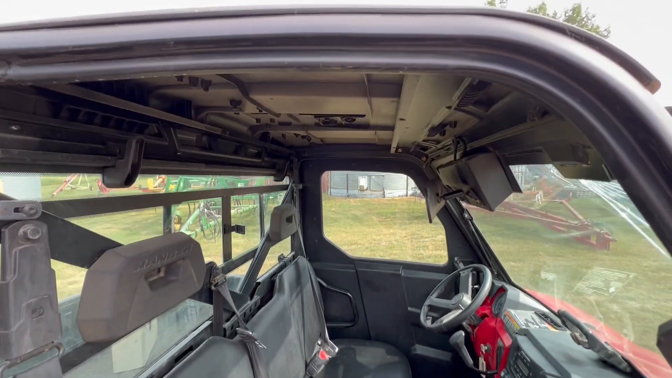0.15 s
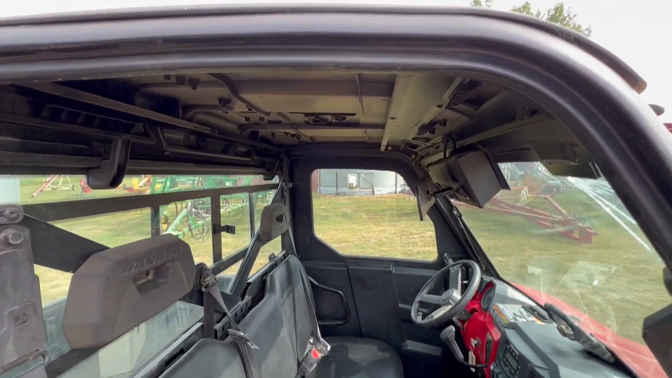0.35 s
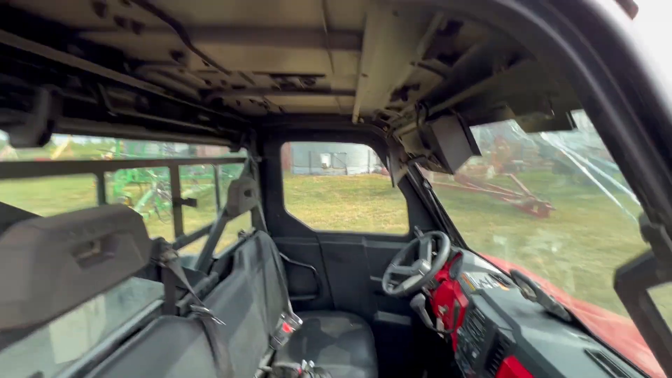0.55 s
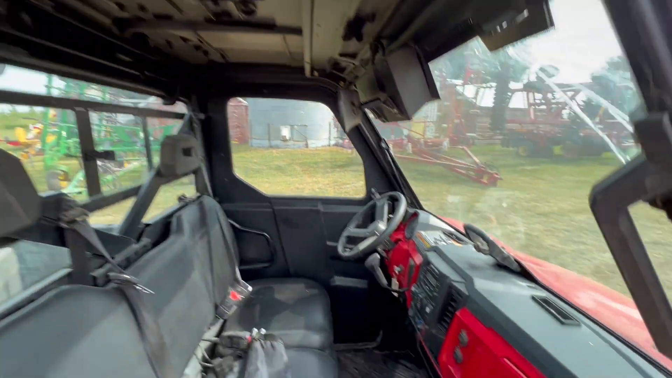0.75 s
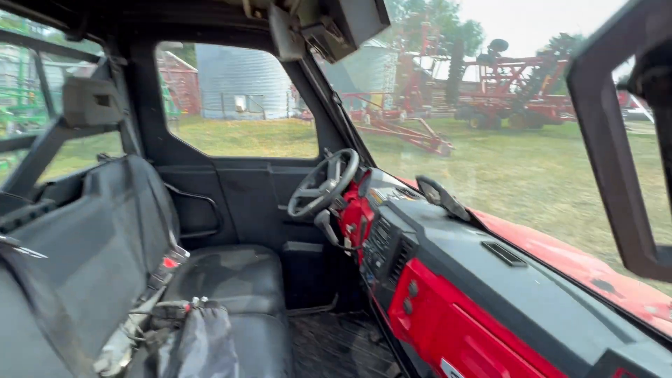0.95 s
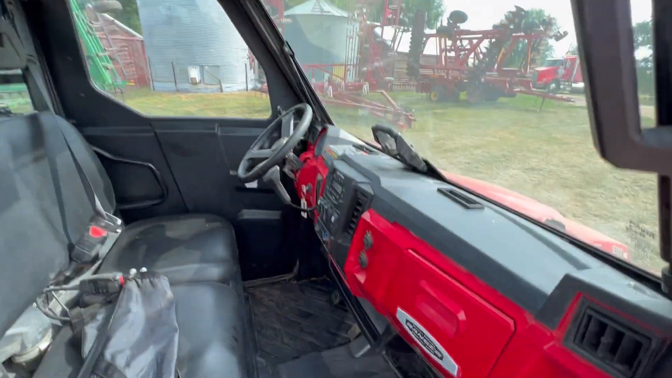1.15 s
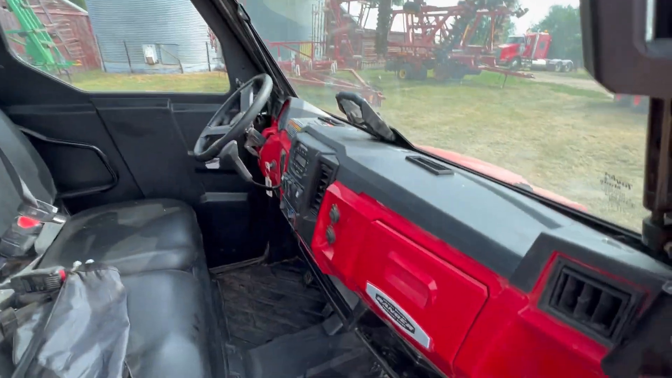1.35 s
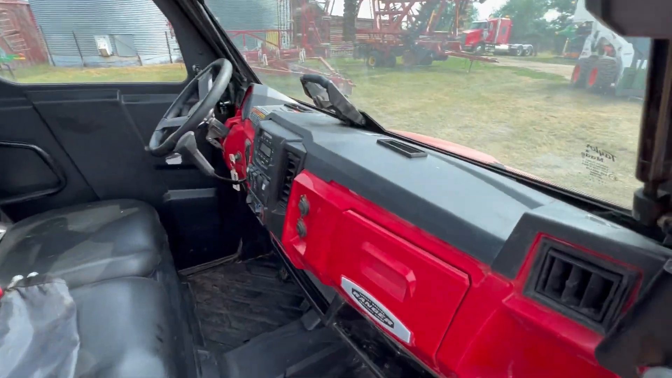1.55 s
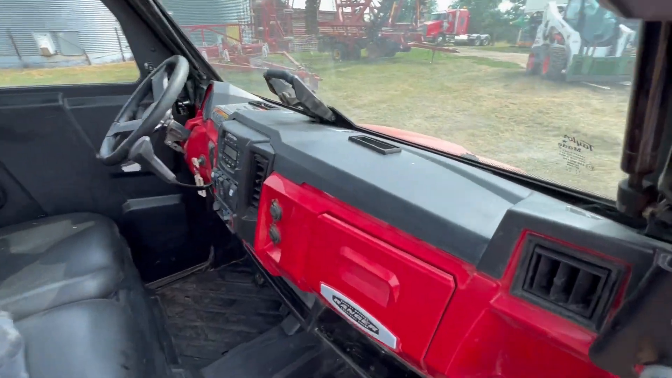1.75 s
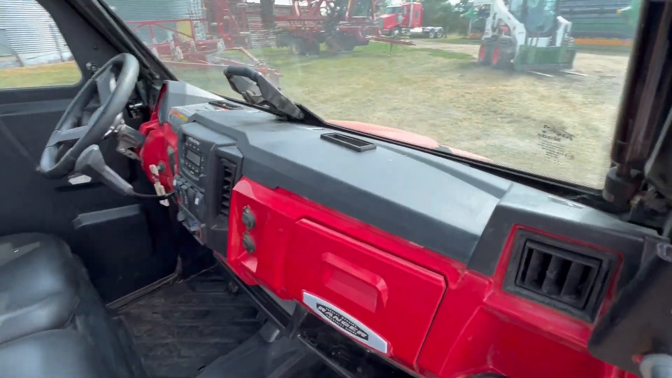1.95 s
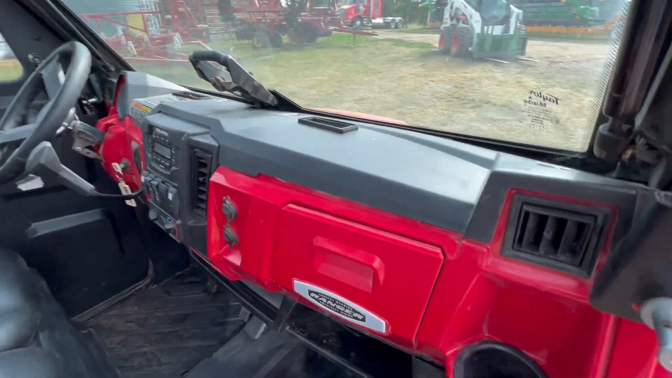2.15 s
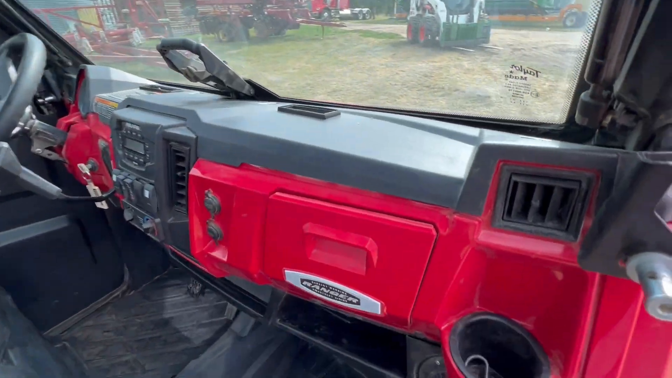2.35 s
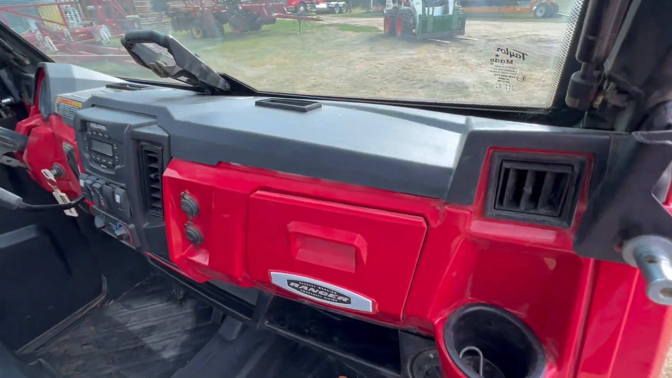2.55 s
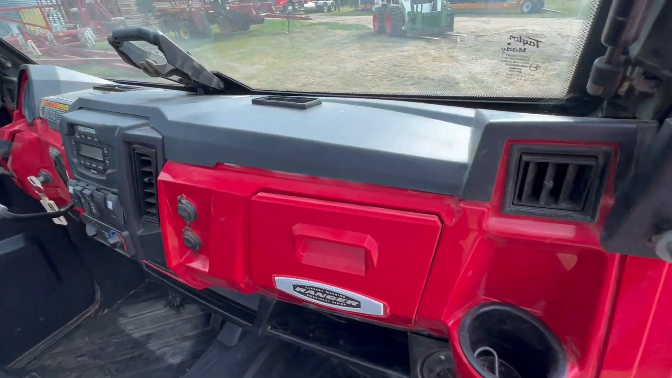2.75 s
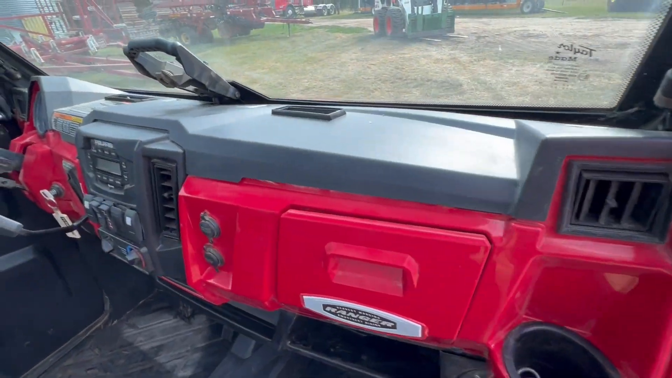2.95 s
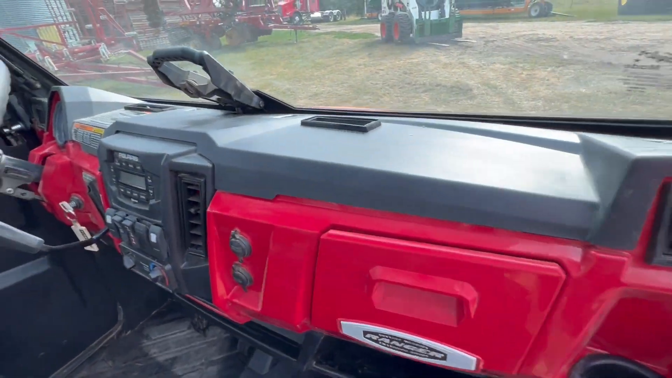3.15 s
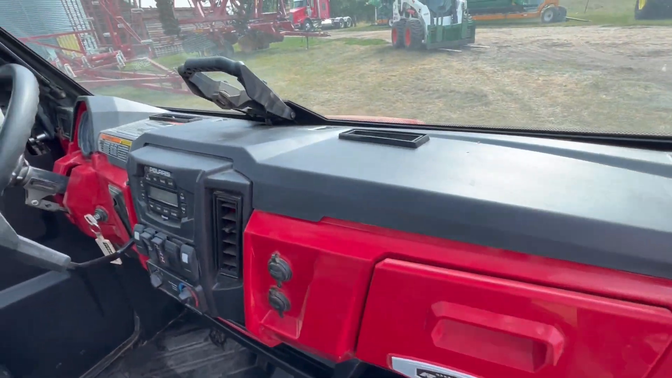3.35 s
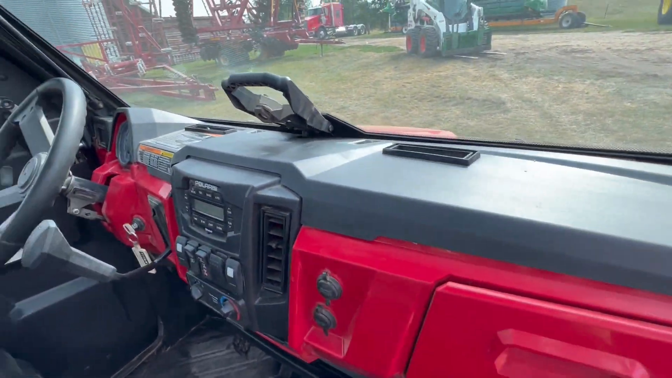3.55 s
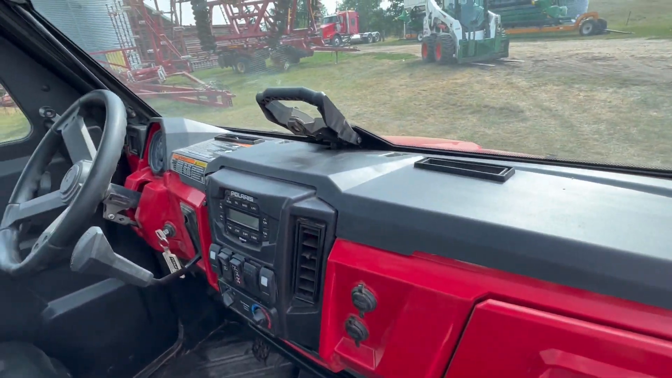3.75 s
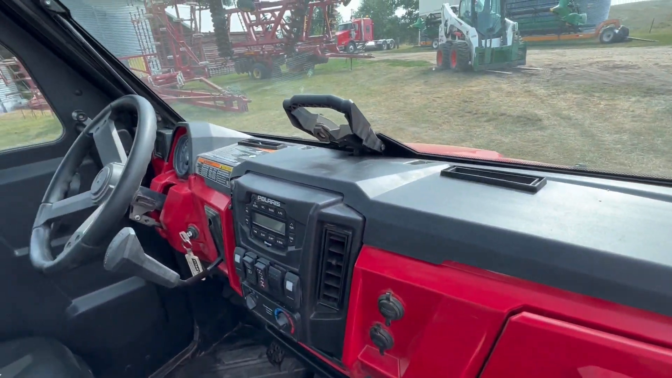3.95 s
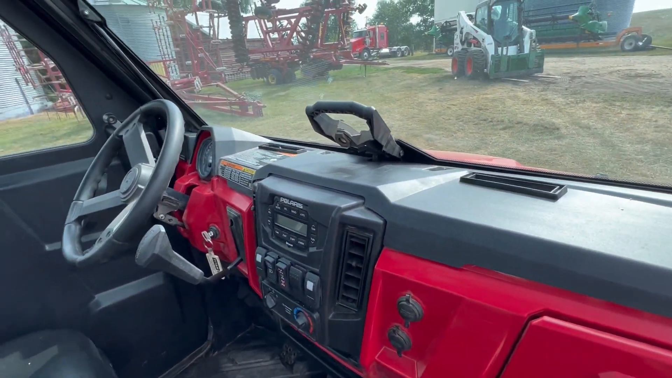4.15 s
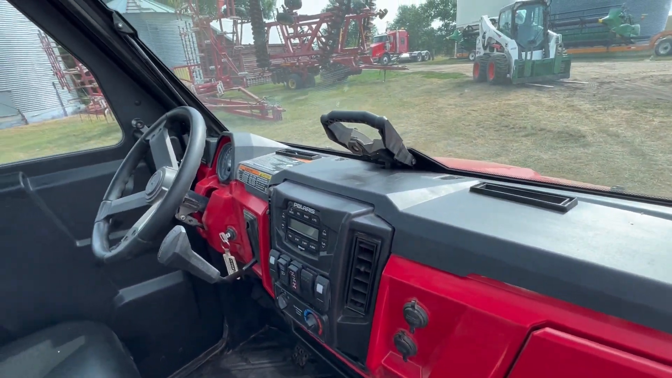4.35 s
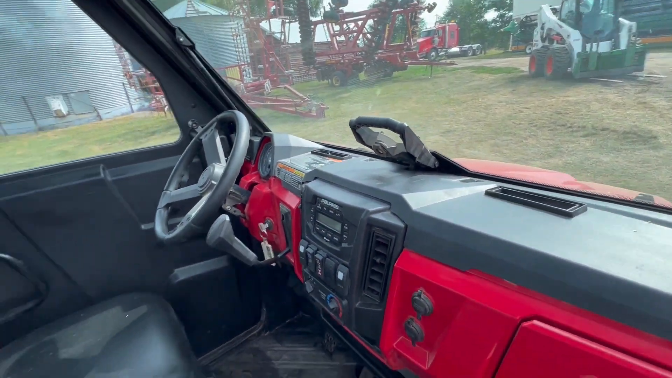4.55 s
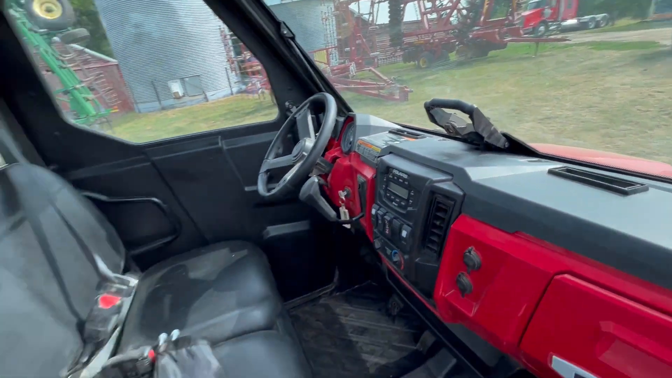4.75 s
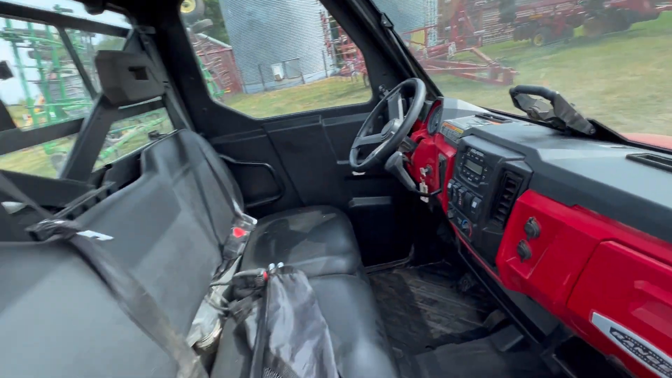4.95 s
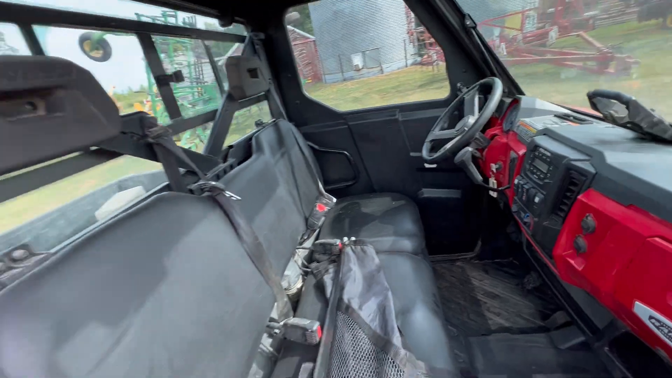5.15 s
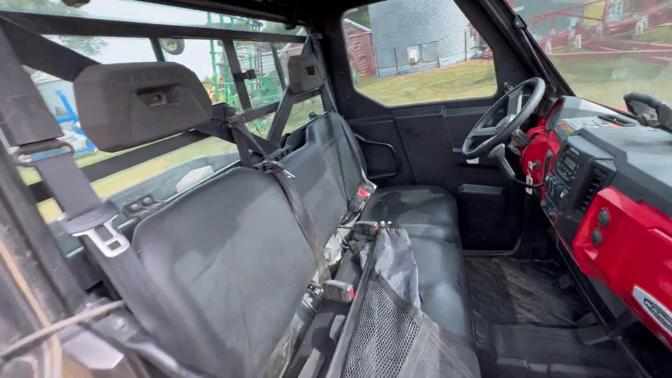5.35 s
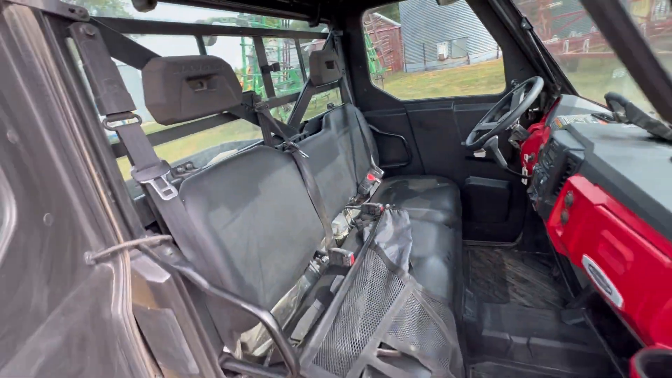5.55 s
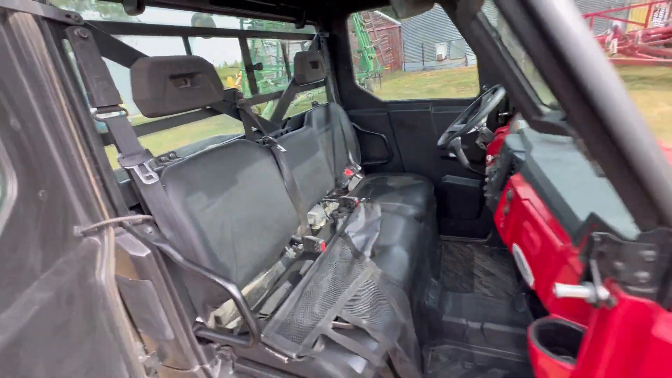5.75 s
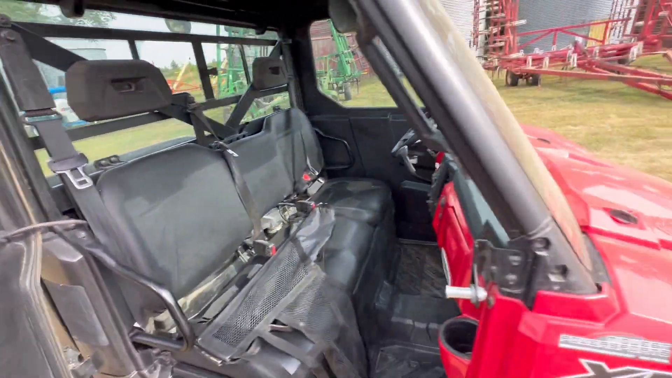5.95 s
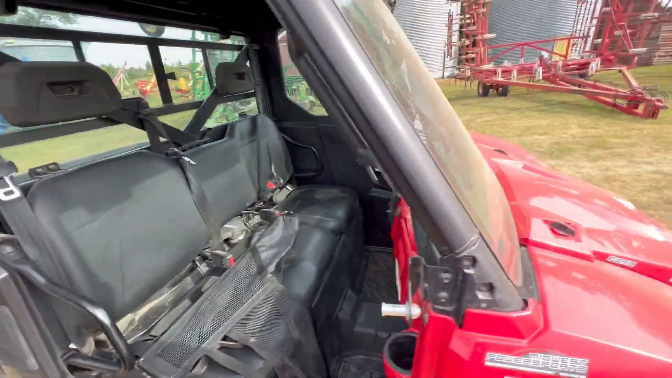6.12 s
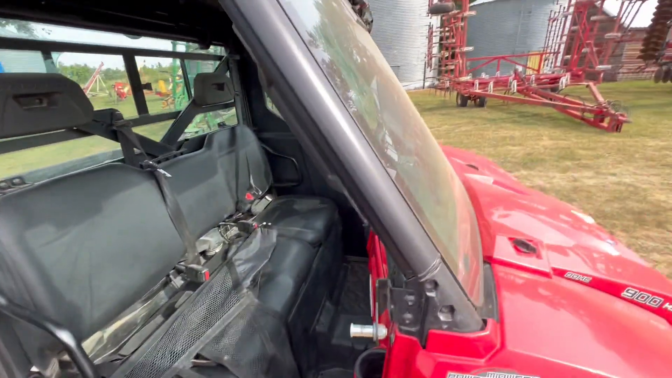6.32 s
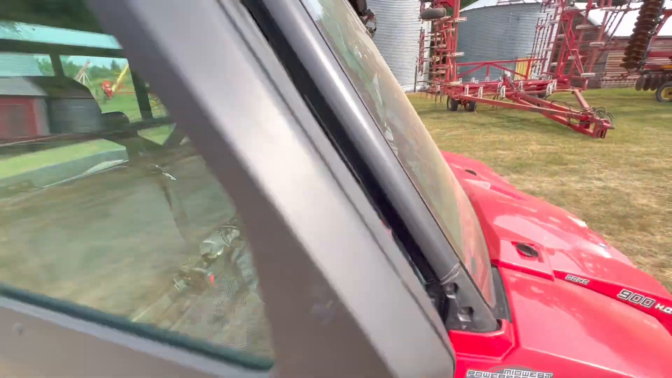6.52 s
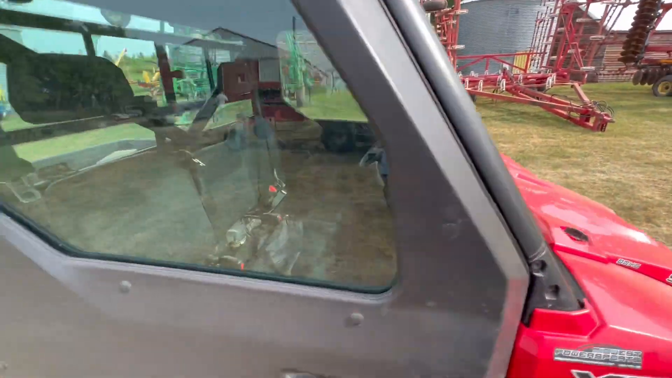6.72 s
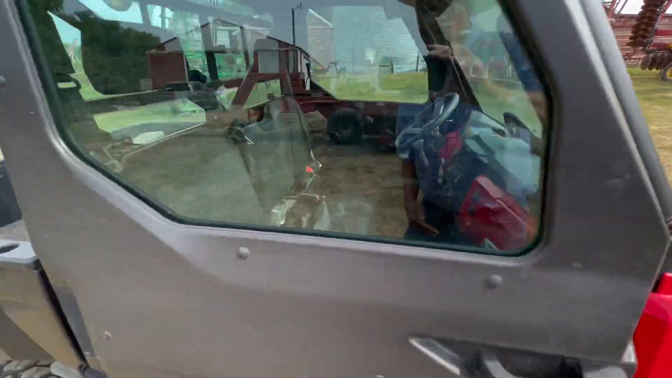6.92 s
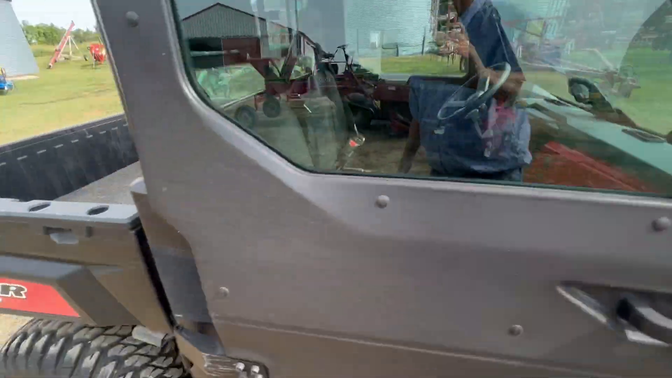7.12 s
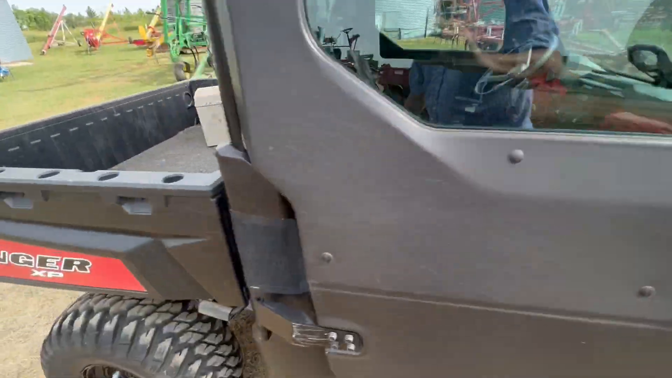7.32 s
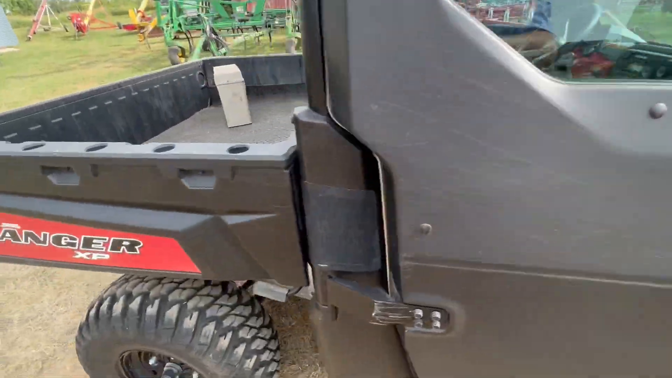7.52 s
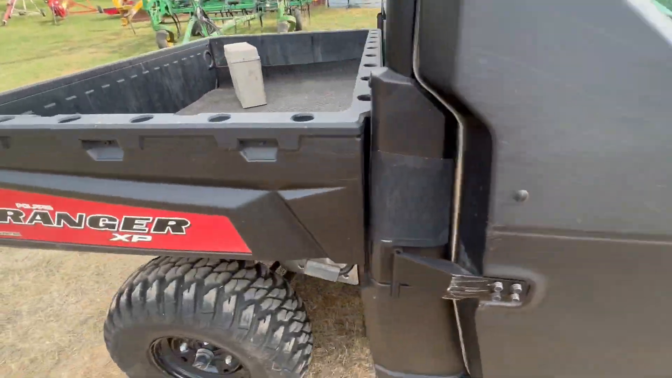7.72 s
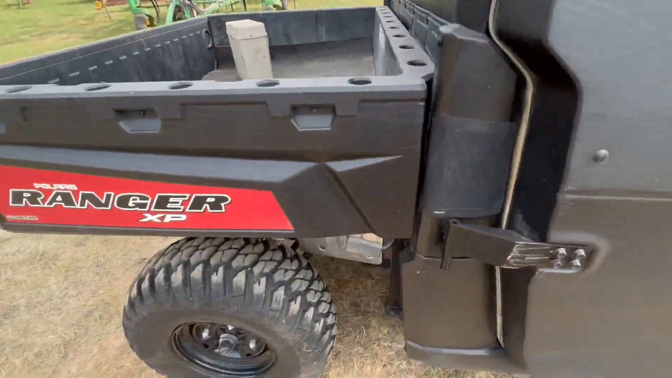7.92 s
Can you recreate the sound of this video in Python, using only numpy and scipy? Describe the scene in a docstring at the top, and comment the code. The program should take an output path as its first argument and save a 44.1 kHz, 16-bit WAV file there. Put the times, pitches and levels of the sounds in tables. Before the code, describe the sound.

Soft rustling, small knocks and wind buffets among chirping sparrows, then a brief rising squeak and a loud, rattling slam of a utility vehicle door.

```python
"""A plastic door slams on a small utility vehicle in a farm yard, close to a phone's two microphones.
Noise bursts crack on the latch at every bounce and ring the panels; a dry hinge squeaks as a rising tone.
Knocks near the cab are noise bursts through resonances. Wind buffets the microphones as deep noise bands,
clothes and grass rustle as hiss. Sparrows chirp in gliding tones, echoed by the sheds around;
beneath lie the quiet open-air floor and the hum of a distant fan."""
import sys
import numpy as np
from scipy import signal
from scipy.fft import rfft, irfft
from scipy.io import wavfile
from scipy.ndimage import uniform_filter1d

SR = 44100
rng = np.random.default_rng(int(sys.argv[2]) if len(sys.argv) > 2 else 0)


def dump_mix(stems):
    """Bounce the given channels to the path in sys.argv[1] as a 16-bit WAV at rate SR."""
    frames = np.atleast_2d(stems).T  # one column per channel
    limited = np.clip(frames, -1, 1)  # hard clip at full scale
    pcm = np.round(limited * 32767).astype(np.int16)
    wavfile.write(sys.argv[1], SR, pcm)


N = 352094
T = np.arange(N) / SR
# Levels in the tables are set ahead of panning, mixing and the microphone stage.


def undb(db):
    """Amplitude factor for a level in dB."""
    return 10 ** (np.asarray(db) / 20)


def unit(x):
    """Scale to an rms of 1."""
    return x / np.sqrt(np.mean(x ** 2))


def curve(table):
    """Columns of a table as signals, and where the table runs."""
    s, *cols = np.transpose(table)
    return [np.interp(T, s, c) for c in cols], (T >= s[0]) & (T <= s[-1])


def white():
    """Two unrelated white noises."""
    return rng.standard_normal((2, N))


def coloured(points):
    """Two unrelated noises with the given spectrum, rms 1 over both."""
    hz, db = np.transpose(points)
    f = np.maximum(np.arange(N // 2 + 1) * SR / N, 1)
    gain = undb(np.interp(np.log(f), np.log(hz), db))
    return unit(irfft(rfft(white()) * gain, N))


def band(x, lo_hz, hi_hz):
    """Band-pass filter."""
    return signal.sosfilt(signal.butter(2, [lo_hz, hi_hz], "band", fs=SR, output="sos"), x)


def resonate(x, modes):
    """Sum of resonances (Hz, width in Hz, dB), as a struck body rings at its modes."""
    return sum(undb(db) * signal.lfilter(*signal.iirpeak(hz, hz / width, SR), x) for hz, width, db in modes)


def walk(rate):
    """Random levels held 1 / rate s and slewed twice; spread near 1."""
    k = int(SR / rate)
    steps = np.repeat(rng.standard_normal(N // k + 1), k)
    return 1.5 * uniform_filter1d(uniform_filter1d(steps, k), k)[:N]


def pair(x, alike, pan_db=0., lag=0):
    """Two noises to left and right with likeness 0-1; left lags by some samples (leads if negative)."""
    a = np.clip(alike, 0, 1)
    shared, apart = np.sqrt(1 + a) * x[0], np.sqrt(1 - a) * x[1]
    left, right = shared + apart, shared - apart
    return np.array([np.roll(left, lag) * undb(pan_db / 2), right * undb(-pan_db / 2)]) / np.sqrt(2)


def blows(s, db, t60, rise_s):
    """Envelope of hits: a quick rise and an exponential fall from each."""
    env = np.zeros(N)
    for s0, d, t in zip(s, db, np.broadcast_to(np.maximum(t60, .005), len(s))):
        at = slice(int(s0 * SR), int((s0 + t) * SR))
        u = T[at] - s0
        env[at] += undb(d - 60 * u / t) * np.clip(u / rise_s, 0, 1)
    return env


# Latch strike and bounces of the door, close by. Each row: start in seconds, crack level in dB.
LATCH_HITS = [(6.5975, -43), (6.609, -18.5), (6.6177, -5.5), (6.6298, -17.5), (6.643, -16.5),
              (6.6566, -13.5), (6.665, -19), (6.696, -19), (6.722, -30), (6.7333, -25.5), (6.775, -44),
              (6.81, -28), (6.822, -35), (6.8823, -39.5), (6.901, -42), (6.966, -57), (6.994, -48.5),
              (7.054, -66)]
# Modes of door and latch, deep to bright. Each row: frequency in Hz, width in Hz, level in dB.
PANEL_MODES = [(74, 17.6, 5), (179, 16, -2), (223, 25, -5), (345.6, 15, 5.5), (493, 14, 2.5), (645, 78, 3),
               (783, 63, 2.5), (901, 87, 1), (1171, 99, -1), (1910, 300, -8.5), (2420, 160, -1.5),
               (3570, 350, 2), (5500, 790, -4)]
# Spectrum of the latch crack. Each row: frequency in Hz, relative level in dB per Hz.
CRACK_SPECTRUM = [(900, -34), (1500, -2.5), (2500, -3), (3600, -8), (5700, -9.5), (7600, -24.5),
                  (8500, -12.5), (11000, -30)]
# The latch rings higher as it closes, lower once it only rattles.
# Each row: time in seconds, lean towards the upper modes in dB.
LATCH_TILT = [(6.625, -9), (6.655, 11.5), (6.7, -2.5)]
THUD_DB, THUD_HOLD_S, THUD_FADE_DB_S = 0, 0.13, 37  # the heavy swing holds, then dies away
PANEL_DB, PANEL_PER_CRACK_DB = 3.5, 0.7347  # the panels take each bounce, the weak ones relatively more


def door():
    """Every bounce cracks on the latch and shakes the panels, which ring on at their modes."""
    s, crack_db = np.transpose(LATCH_HITS)
    (lean_db,), _ = curve(LATCH_TILT)
    thud_db = THUD_DB - THUD_FADE_DB_S * np.maximum(s - s[0] - THUD_HOLD_S, 0)
    panel_db = PANEL_DB + PANEL_PER_CRACK_DB * crack_db
    low = [m for m in PANEL_MODES if m[0] < 300]
    mid = [m for m in PANEL_MODES if 300 <= m[0] < 1500]
    high = [m for m in PANEL_MODES if m[0] >= 1500]
    # the heavy panels are shaken without treble
    thud = resonate(band(white(), 45, 530) * blows(s, thud_db, 0.2, 0.02), low)
    panel_shake = band(white(), 250, 3000) * undb(4.6 * walk(70))
    panel = resonate(panel_shake * blows(s, panel_db, 0.13, 0.0055), mid)
    snap = blows(s, crack_db, .055, .0015)
    crack = coloured(CRACK_SPECTRUM) * snap * undb(-6.0)
    latch_shake = white() * snap
    latch_lower = resonate(latch_shake * undb(-lean_db), high[:2])
    latch_upper = resonate(latch_shake * undb(lean_db), high[2:])
    # weaker bounces touch more softly, so their crack is duller
    sharp = band(white(), 6000, 17000) * snap ** 1.9 * undb(-3.5)
    near = pair(thud, 0.94, 2.1) + pair(panel, 0.55, -1.5, lag=-15) + pair(crack, 0.12, 0.85)
    near = near + pair(latch_lower + latch_upper, 0.093, 6.1) + pair(sharp, 0.44)
    return near + undb(-11.0) * sheds(band(near.mean(axis=0), 60, 4900))


# Single heavy pushes of the door against its rubber seal. Each row: centre in seconds, level in dB.
SEAL_PUSHES = [(6.6452, -10), (6.675, -17.5), (6.689, -8), (6.728, -5), (6.764, -15), (6.842, -16)]
PUSH_S = 0.001  # standard deviation of each dip


def seal():
    """Each push is one soft dip in pressure that rings the panels, a little louder at the left microphone."""
    dips = -sum(undb(db) * np.exp(-.5 * ((T - s) / PUSH_S) ** 2) for s, db in SEAL_PUSHES)
    sound = band(dips, 45, 900) + undb(5) * resonate(dips, PANEL_MODES[1:])
    return sound * undb(np.array([[1], [-1]]))


# The squeak swells while the door gathers speed, then lets go
SQUEAK_S, SQUEAK_SWELL_S, SQUEAK_HZ, SQUEAK_RISE_HZ_S = 6.457, 0.055, 7347, 3600
SQUEAK_DB, SQUEAK_SWELL_DB, SQUEAK_LET_GO_DB, SQUEAK_T60_S, SQUEAK_OCTAVE_DB = -28.5, 14, -6, 0.11, -9


def hinge():
    """Stick-slip squeak of the dry hinge with its octave."""
    late = T - SQUEAK_S - SQUEAK_SWELL_S
    swell_db = SQUEAK_SWELL_DB * late / SQUEAK_SWELL_S
    let_go_db = SQUEAK_LET_GO_DB - 60 * late / SQUEAK_T60_S
    db = SQUEAK_DB + np.where(late < 0, swell_db, let_go_db)
    hz = SQUEAK_HZ + SQUEAK_RISE_HZ_S * np.clip(T - SQUEAK_S, 0, SQUEAK_SWELL_S)
    phase = 2 * np.pi * np.cumsum(hz * (1 + .002 * walk(340))) / SR
    env = uniform_filter1d((T > SQUEAK_S) * undb(db), size=300) * undb(3.0 * walk(120))
    tone = np.sqrt(2) * env * (np.sin(phase) + undb(SQUEAK_OCTAVE_DB) * np.sin(2 * phase))
    return np.array([tone * undb(-0.5), np.roll(tone, 1) * undb(-4.5)])


# Knocks and ticks near the cab. Each row: start in seconds, crack level in dB, thud level in dB,
# body level in dB, 60 dB decay time of crack and body in seconds.
CAB_KNOCKS = [(0.316, -52, -84, -87, 0.009), (1.1348, -37, -31.5, -31, 0.18),
              (1.492, -36, -35, -31.5, 0.16), (1.5688, -33, -37, -33, 0.14), (2.007, -70, -75, -51.5, 0.02),
              (2.0446, -52, -78, -57, 0.019), (2.148, -75, -74, -53, 0.028), (2.507, -66, -78, -65, 0.12),
              (4.3, -70, -53.5, -57, 0.29), (5.566, -59, -41.5, -47.5, 0.22),
              (5.7563, -65, -32, -46, 0.071), (5.836, -64, -27.5, -45.5, 0.034),
              (6.179, -59, -56.5, -53, 0.68), (6.2557, -46, -52, -49, 0.031), (6.307, -51, -53, -45, 0.062)]
# Modes of the cab plastics. Each row: frequency in Hz, width in Hz, level in dB.
CAB_MODES = [(172, 26, 0), (275, 60, -0.5), (404, 75, 1.5), (590, 14, 0), (728.6, 22, 3), (4900, 360, -1),
             (5780, 1900, 0.5)]


def knocks():
    """Each knock: a crack, a hollow body and a thud through the cab plastics."""
    s, crack_db, thud_db, body_db, t60 = np.transpose(CAB_KNOCKS)
    ring = resonate(white(), CAB_MODES) + undb(-18.5) * white()
    crack = unit(band(ring, 1300, 9600)) * blows(s, crack_db, t60, 0.00021)
    body = unit(band(band(ring, 240, 3200), 170, 3270)) * blows(s, body_db, t60, 0.00088)
    thud = unit(band(band(ring, 67, 310), 98, 420)) * blows(s, thud_db, 1.88 * t60, 0.0068)
    return pair(crack + body + thud, 0.11, 3.6)


# Wind on the microphone ports, one table for each spell. Each row: time in seconds, level in dB.
WIND_SPELLS = [
    [(0, -40), (.48, -45.5), (.6, -34), (.9, -43), (1.25, -44.5), (1.46, -58)],
    [(4.33, -68.5), (4.9, -50), (5.08, -41.5), (5.25, -42.5), (5.5, -54), (5.8, -43.5), (6.1, -65.5),
     (6.6, -50.5)],
    [(7.0, -38), (7.48, -57.5), (7.7, -53), (7.98, -61)],
]
# Single eddies that thump. Each row: start in seconds, low level in dB, upper band relative to low in dB.
WIND_THUMPS = [(0.009, -22, -6.5), (0.076, -36, 9.5), (0.177, -35, -5), (0.496, -26, -30), (0.655, -22, -2),
               (0.699, -22.5, -6), (0.735, -34, 0), (0.924, -29.5, -2.5), (1.032, -19, -22),
               (1.094, -23.5, -2), (1.108, -15.5, -9), (1.209, -17.5, -11.5), (5.036, -25, -26),
               (5.072, -27.5, -34), (5.166, -32, -31), (5.197, -34, -5)]
# Side of the wind, mostly the left port in the later gusts. Each row: time in seconds, left minus right in dB.
WIND_SIDE = [(4.9, -1), (5.15, 10.5), (6.2, 4.5)]


def wind():
    """Eddies rumble over the ports in lumps, with a fluttering upper band; single ones thump."""
    low = pair(unit(band(band(white(), 37, 102.2), 32, 155)), 1.0, 0.39)
    high = pair(unit(band(band(white(), 118, 257), 87, 390)), 0.62, 1.3)
    s, db, upper_db = np.transpose(WIND_THUMPS)
    out = low * blows(s, db, 0.099, 0.0098) + high * blows(s, db + upper_db, 0.081, 0.0036)
    lumps, flutter = walk(22), walk(50)
    upper_reach_db = -12.5 + 3 * lumps + 3 * flutter
    rumble = low * undb(3.23 * lumps) + high * undb(upper_reach_db)
    for table in WIND_SPELLS:
        (db,), on = curve(table)
        soft_edges = uniform_filter1d(on * 1., 800)
        out = out + soft_edges * undb(db) * rumble
    (pan_db,), _ = curve(WIND_SIDE)
    return out * undb(np.array([pan_db, -pan_db]) / 2)


# Cloth and grass that rustle all along, close to the microphones.
# Each row: time in seconds, hiss level in dB, duller body relative to the hiss in dB.
RUSTLE_LEVELS = [(0, -65.5, -5), (.4, -75.5, -34), (.95, -72.5, -7), (1.4, -63.5, 1.5), (1.9, -64.5, 3),
                 (2.3, -72, -2.5), (2.8, -79, -2.5), (4.2, -85.5, 3.5), (4.45, -63.5, -2.5),
                 (5.4, -64.5, -3.5), (6.1, -67, 1), (7.0, -65, -6), (7.65, -66.5, 7.5), (7.98, -78, -5)]
# Spectra of hiss and body. Each row: frequency in Hz, relative level in dB per Hz.
HISS_SPECTRUM = [(1290, -35.5), (2200, -9.5), (5250, -4.5), (7620, -10), (8350, -2), (11000, -17),
                 (14500, -15.5), (15900, -31)]
BODY_SPECTRUM = [(250, -9), (450, -3), (900, -4.5), (1500, -2), (2600, -10), (3600, -21)]
# Strokes of cloth and steps through grass. Each row: start in seconds, length in seconds, hiss level in dB.
RUSTLE_STROKES = [(2.59, 0.1, -74), (0.45, 0.445, -53), (2.16, 0.16, -62), (3.906, 0.21, -69.5),
                  (4.529, 0.064, -58), (4.773, 0.26, -58), (4.99, 0.37, -60), (5.471, 0.55, -56),
                  (6.13, 0.5, -64), (7.034, 0.24, -56), (7.241, 0.2, -63.5), (7.721, 0.073, -64)]
STROKE_BODY_DB = -6  # relative to the hiss


def rustle():
    """Fine dense grains of cloth and grass: a hiss and a duller body, swelling with each stroke."""
    hiss = pair(coloured(HISS_SPECTRUM), 0.081, 6.0, lag=4) * undb(1.78 * walk(90) + 1.2 * walk(14))
    body = pair(coloured(BODY_SPECTRUM), 0.11, 0.38) * undb(2.7 * walk(33))
    (db, body_db), _ = curve(RUSTLE_LEVELS)
    swell = np.zeros(N)
    for s, length, d in RUSTLE_STROKES:
        swell += undb(d) * np.sin(np.pi * np.clip((T - s) / length, 0, 1)) ** 0.86
    steady = undb(db) * (hiss + body * undb(body_db))
    return steady + swell * (hiss + body * undb(STROKE_BODY_DB))


# Falling cheeps of the nearer sparrows.
# Each row: start in seconds, length in seconds, top pitch in Hz, starting level in dB.
FALLING_CHEEPS = [(0.026, 0.13, 6330, -60), (0.453, 0.13, 5540, -55.5), (0.84, 0.15, 4750, -55),
                  (2.106, 0.07, 3850, -65.5), (5.382, 0.13, 4480, -55.5), (5.411, 0.07, 5490, -53),
                  (1.837, 0.13, 5470, -55), (2.219, 0.29, 6680, -58.5), (2.665, 0.085, 5770, -59.5),
                  (3.101, 0.056, 5710, -54.5), (3.192, 0.18, 4930, -56.5), (3.472, 0.11, 3440, -62),
                  (3.566, 0.42, 6750, -58.5), (4.187, 0.24, 6770, -57.5), (4.76, 0.16, 5970, -51.5),
                  (5.889, 0.083, 5570, -52), (6.38, 0.1, 5170, -51), (7.075, 0.035, 5570, -54),
                  (7.789, 0.16, 5430, -53.5)]
# Short chirps that flick up and drop again. Each row: start in seconds, length in seconds,
# top pitch in Hz, depth of the flick in octaves, level at the top in dB.
FLICKED_CHIRPS = [(0.122, 0.086, 5820, 0.36, -60), (0.532, 0.038, 3910, 0.13, -60),
                  (1.273, 0.052, 5870, 0.32, -60.5), (1.288, 0.071, 4690, 0.88, -57),
                  (1.373, 0.024, 4200, 0.55, -56), (1.383, 0.043, 6300, 0.44, -58.5),
                  (2.06, 0.064, 4360, 0.058, -57), (2.754, 0.074, 5060, 0.047, -64.5),
                  (2.963, 0.069, 5600, 0.2, -61), (2.987, 0.11, 5100, 1, -53),
                  (3.033, 0.06, 4300, 0.15, -54.5), (3.066, 0.045, 7140, 0.17, -64),
                  (3.225, 0.046, 3916, 0.036, -64), (3.434, 0.068, 4550, 0.048, -57.5),
                  (3.979, 0.05, 5950, 0.25, -55.5), (4.011, 0.044, 4750, 0.7, -47.5),
                  (4.05, 0.062, 6040, 0.097, -58), (4.078, 0.048, 3800, 0.43, -51),
                  (4.534, 0.046, 6140, 0.23, -54.5), (4.561, 0.04, 5140, 0.65, -45.5),
                  (4.615, 0.048, 3950, 0.35, -48), (5.364, 0.043, 5180, 0.12, -51.5),
                  (5.795, 0.06, 4700, 0.11, -60), (6.106, 0.078, 4480, 0.046, -52.5),
                  (6.483, 0.038, 3520, 0.12, -50)]
SHAKE, SHAKE_GROWS_PER_S = .015, .17  # pitch shake as a share of the pitch, before each kind's harshness
OVERTONE_DB, ECHO_DB = -25.5, 1


def sparrows():
    """Harsh gliding notes: pitch shakes, the syrinx halves sing apart, long notes break up, sheds smear."""
    near, far = np.zeros(N), np.zeros(N)
    shake = walk(300) + walk(55)
    beat = (1 + .5 * walk(900)) * undb(2.2 * walk(45))
    chance = rng.random(size=(150, 3))
    flock = [(a * T[-1], 0.03 + 0.1 * b, 3300 + 3400 * c, -60.5 - 6 * b) for a, b, c in chance]
    layers = ((near, FALLING_CHEEPS, cheep, 1.3), (near, FLICKED_CHIRPS, chirp, .4), (far, flock, cheep, 1))
    for dry, notes, shape, harsh in layers:
        for s, length, *pitch, db in notes:
            at = slice(int(s * SR), int((s + length) * SR))
            u = T[at] - s
            hz, fade_db = shape(u, length, *pitch)
            wobble = harsh * (SHAKE + SHAKE_GROWS_PER_S * u) * shake[at]
            phase = 2 * np.pi * np.cumsum(hz * (1 + wobble)) / SR
            swell = np.clip(4 * np.minimum(u, s + length - T[at]) / length, 0, 1)
            second_half = harsh * undb(-9) * np.sin(.84 * phase)
            voice = np.sin(phase) + second_half + undb(OVERTONE_DB) * np.sin(2 * phase)
            dry[at] += swell * beat[at] * undb(db + fade_db) * voice
    direct = np.array([near * undb(11.0), np.roll(near, 12) * undb(-38)]) * undb(-3.0)
    # the rest of the flock is far off and reaches the phone only as echoes, blurred and off the sheds
    echoes = blur(near) + blur(far) * undb(-5.5) + sheds(near + far)
    return direct + echoes * undb(ECHO_DB) * undb(np.array([[3], [-3]]))


CHEEP_END_HZ, CHEEP_FALL_S, CHEEP_FADE_DB_S = 2860, .11, 66.5


def cheep(u, length, top_hz):
    """Pitch and dB of a cheep: it sinks towards one low pitch and fades."""
    hz = CHEEP_END_HZ + (top_hz - CHEEP_END_HZ) * np.exp(-u / CHEEP_FALL_S)
    return hz, -CHEEP_FADE_DB_S * u


CHIRP_TOP_AT = .4  # share of the note's length


def chirp(u, length, top_hz, depth):
    """Pitch and dB of a chirp: a quick rise to a rounded top, where it is loudest, and a slower drop."""
    late = u / length - CHIRP_TOP_AT
    off = np.where(late < 0, -late / CHIRP_TOP_AT, late / (1 - CHIRP_TOP_AT))
    return top_hz * 2 ** (-depth * off ** 1.4), -11 * off


BLUR_T60_S, BLUR_DB = 0.14, -0.5  # leaves and close walls blur each note


def blur(x):
    """Dense early echoes, different in each ear."""
    u = T[:SR // 5]
    tail = rng.standard_normal((2, len(u))) * undb(-60 * u / BLUR_T60_S)
    tail /= np.sqrt(np.sum(tail[0] ** 2))
    return signal.fftconvolve(x[None], tail, axes=1)[:, :N] * undb(BLUR_DB)


SHEDS_T60_S, SHEDS_DB = .7, -3


def sheds(x):
    """Scattered echoes off sheds and bins, different in each ear."""
    u = T[:SR]
    tail = rng.standard_normal((2, SR)) * undb(-60 * u / SHEDS_T60_S) * np.clip(u / 0.0085, 0, 1)
    tail *= undb(SHEDS_DB) / np.sqrt(np.sum(tail[0] ** 2))
    return signal.fftconvolve(x[None], tail, axes=1)[:, :N]


# Spectrum of the open-air floor. Each row: frequency in Hz, relative level in dB per Hz.
YARD_SPECTRUM = [(18, -45.5), (40, 1), (117, -5.5), (400, -32), (1350, -38), (1700, -29.5), (2500, -36.5),
                 (4500, -24.5), (7500, -39.5), (8400, -38.5), (11000, -55.5), (16000, -72.5)]
YARD_DB = -68
HUM_HZ, HUM_WIDTH_HZ, HUM_DB = 109.4, 7.1, -70


def yard():
    """Quiet open-air floor and the wavering hum of a distant fan, noise through a narrow resonance."""
    hum = unit(resonate(white(), [(HUM_HZ, HUM_WIDTH_HZ, 0)])) * undb(HUM_DB)
    air = coloured(YARD_SPECTRUM) * undb(YARD_DB + 2.5 * walk(2.7) + 2. * walk(13))
    return pair(air, 0.95, 6.7) + pair(hum, 0.37)


def scene():
    """Door, hinge and knocks up close, wind and rustle at the microphones, sparrows and yard around."""
    return door() + seal() + hinge() + knocks() + wind() + rustle() + sparrows() + yard()


TOP_HZ = 15800


def record(dry):
    """The phone thins the deepest bass, rounds the loudest peaks and cuts the top."""
    thinned = signal.lfilter(*signal.butter(1, 30., "high", fs=SR), dry)
    rounded = np.tanh(1.16 * thinned) / 0.98
    return signal.sosfilt(signal.ellip(12, .2, 80, TOP_HZ, fs=SR, output="sos"), rounded)


dry = scene()
out = record(dry)
dump_mix(out)
```